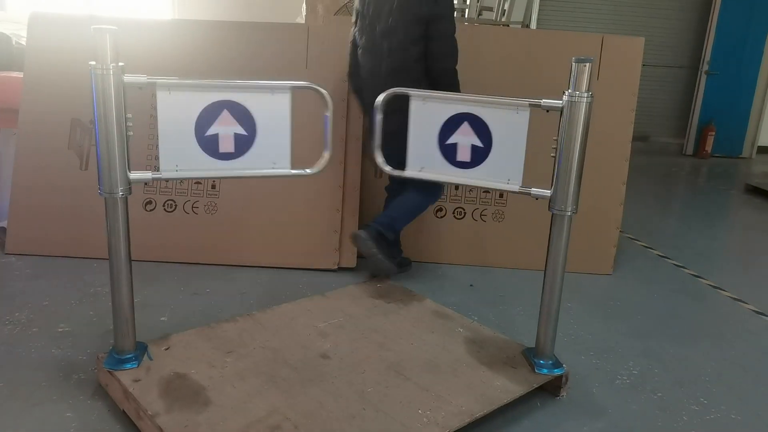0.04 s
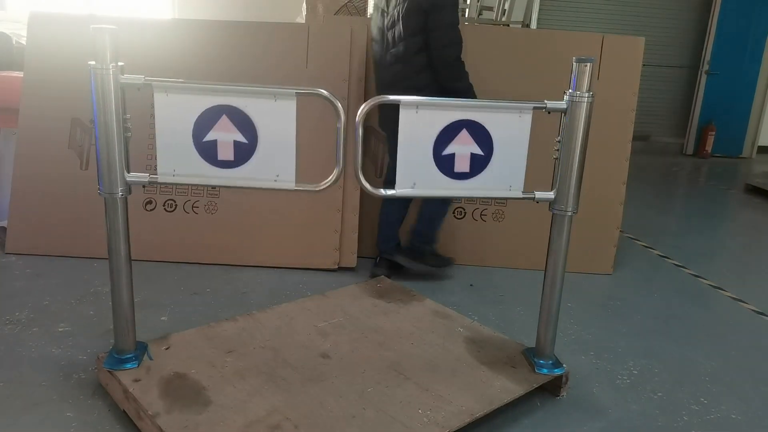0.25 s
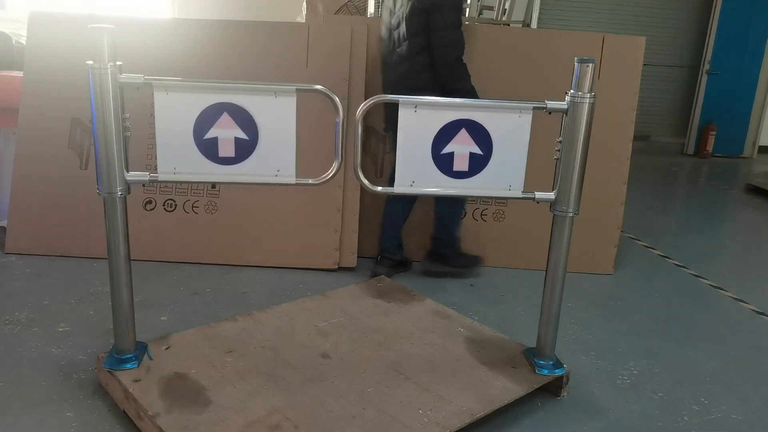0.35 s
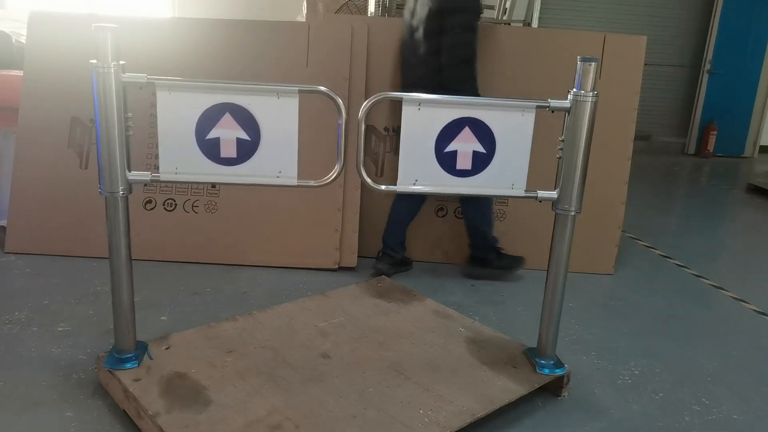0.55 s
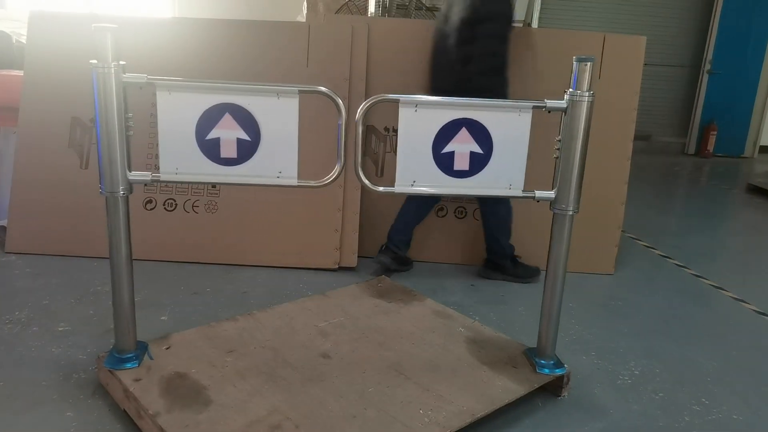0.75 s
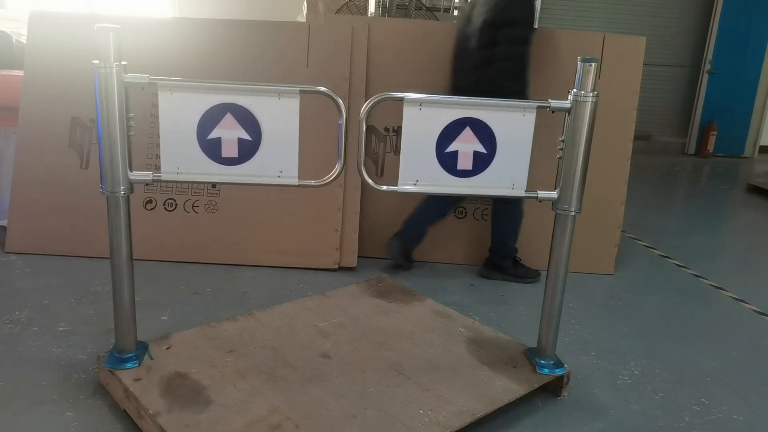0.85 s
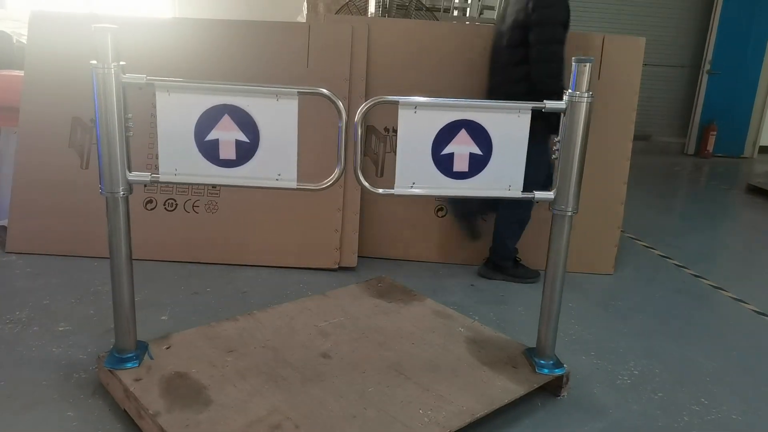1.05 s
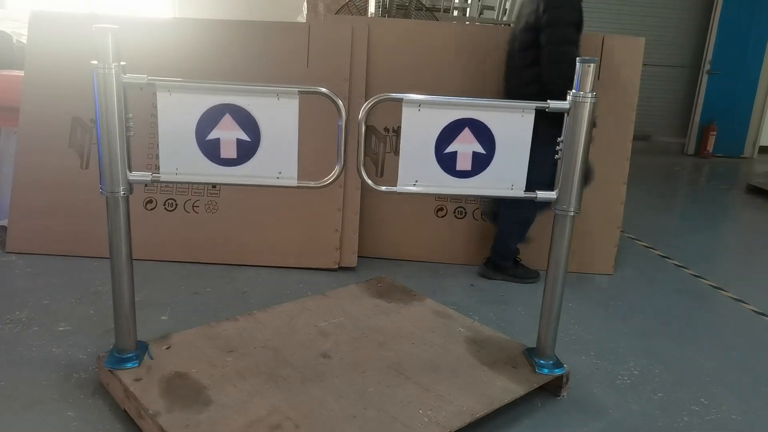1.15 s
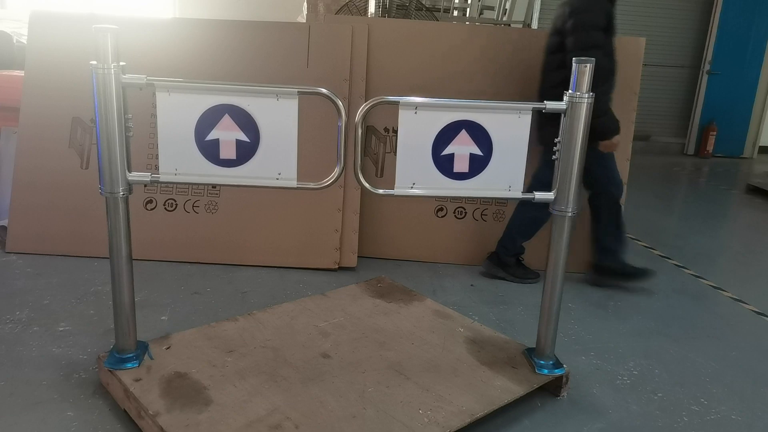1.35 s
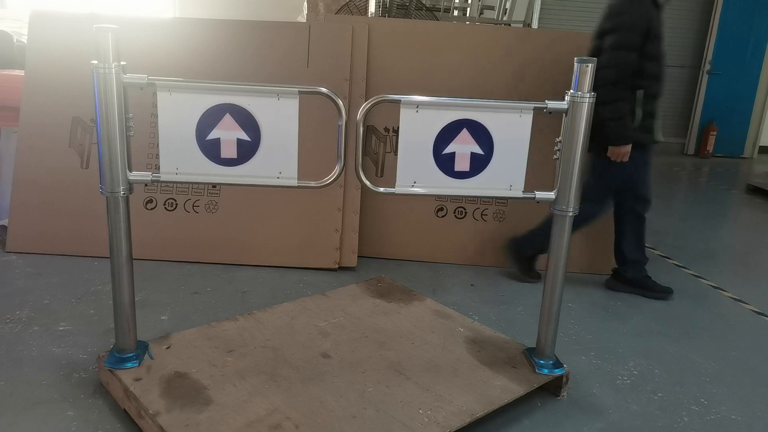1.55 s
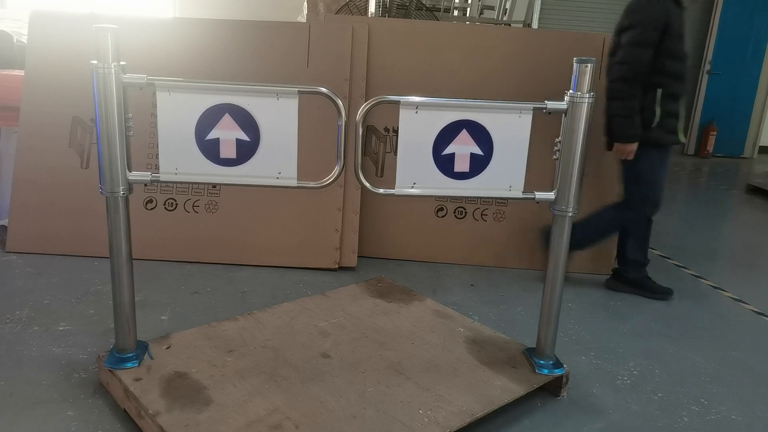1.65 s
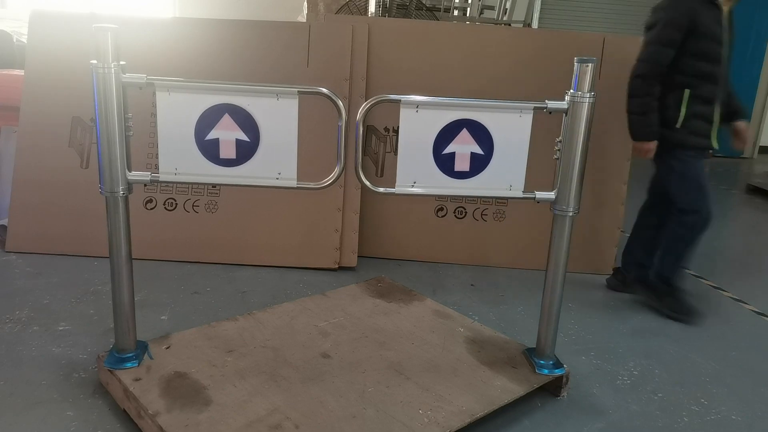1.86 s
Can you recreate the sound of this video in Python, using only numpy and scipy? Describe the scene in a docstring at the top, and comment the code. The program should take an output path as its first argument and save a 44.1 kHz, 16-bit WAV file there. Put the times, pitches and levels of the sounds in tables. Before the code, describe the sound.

A steel swing gate clanks shut at 0.2 seconds in a humming, echoing workshop, rattling on with a ringing frame and ticking latch. From about 0.3 seconds the hollow wooden platform beneath knocks, booms and judders, settling by 0.9. From 1 second soft footsteps move away on concrete while loose metal clinks faintly, and a heavier step at 1.6 seconds leaves a low ring in the floor.

```python
"""A workshop hums; a shoe scuffs faintly. From 0.2 s a steel swing gate falls shut: the wing clanks
against its stop and rattles out, its tube frame sings, the latch ticks. From 0.33 s the post shakes the
hollow wooden platform under it, which knocks, booms and judders. From about 1 s someone walks away while
loose metal clinks; a heavy step at 1.6 s rings the floor.
The right microphone is peaky near 3 kHz, the left near 9 kHz."""
import sys
import numpy as np
from scipy import signal
from scipy.fft import rfft, irfft
from scipy.io import wavfile
from scipy.ndimage import uniform_filter1d

SR = 44100
rng = np.random.default_rng(int(sys.argv[2]) if len(sys.argv) > 2 else 0)


def generate_wav(signal):
    """Clip the signal to [-1, 1] and save it as 16-bit WAV at the path in sys.argv[1]."""
    frames = np.transpose(np.atleast_2d(signal))
    scaled = np.clip(frames, -1, 1) * 32767
    pcm = np.round(scaled).astype(np.int16)
    wavfile.write(sys.argv[1], SR, pcm)


N = 83790

# wing on its stop: t/s, level/dB, ring f/Hz, ring re level/dB, edge re level/dB, ring t60/s
CLANKS = [(0.2024, -33.5, 5030, 1, 9.5, 0.05), (.2175, -28, 3800, 9, -3.5, 0.022),
          (.2225, -24, 3330, 4, -14.5, 0.023), (0.2554, -23.5, 3370, -10, -0.5, 0.023),
          (.2597, -25.5, 2460, 10, -12, 0.033), (0.3041, -32, 2850, 18.5, -11, 0.0061),
          (.313, -29.5, 2800, 8, -2, 0.013), (.338, -22.5, 1870, -4.5, -12.5, 0.066),
          (.395, -36.5, 780, 11.5, -16, 0.065), (0.4212, -36, 2940, 0, 2.5, 0.22),
          (.484, -32, 2770, -2.5, -3.5, 0.24), (.517, -28, 2700, 3, -25, 0.011),
          (.568, -37.5, 2900, 4, -12, 0.053), (.616, -33.5, 2460, 7, -7, 0.035),
          (.644, -33.5, 2640, 3, -12, 0.05), (0.7085, -41.5, 2340, 10, -36, 0.024),
          (.7535, -39.5, 2690, 1.5, -5, 0.064)]
# spectrum of a blow on the platform: f/Hz, level/dB
THUD_COLOUR = [(25, -32), (70, -0.5), (100, -13.5), (140, 0), (220, -5), (450, -16.5), (600, -30),
               (2500, -43.5)]


def amp(db):
    """Decibels to gain."""
    return 10 ** (np.asarray(db) / 20)


def unit(x):
    """Scale to rms 1."""
    return x / np.sqrt(np.mean(x ** 2) + 1e-20)


def read(points, hz):
    """Interpolate a table over log frequency."""
    f_hz, value = np.transpose(points)
    return np.interp(np.log(hz + 1), np.log(f_hz + 1), value)


def envelope(t_s, level_db):
    """Gain curve through breakpoints, silent outside them."""
    return amp(np.interp(np.arange(N) / SR, t_s, level_db, left=-np.inf, right=-np.inf))


def add(mix, t_s, sound):
    """Mix a sound in at t_s."""
    part = mix[..., max(round(t_s * SR), 0):][..., :sound.shape[-1]]
    part += sound[..., :part.shape[-1]]


def convolve(x, response):
    """Convolve per channel, cut to N samples."""
    return signal.fftconvolve(np.atleast_2d(x), np.atleast_2d(response), axes=1)[:, :N]


def colour(points, size=4096):
    """Causal impulse response with the given spectrum."""
    log_gain = np.log(amp(read(points, abs(np.fft.fftfreq(size, 1 / SR)))))
    minimum_phase = np.exp(np.conj(signal.hilbert(log_gain)))
    return np.fft.ifft(minimum_phase).real[:size // 2]


def tint(x, points):
    """Filter at unit power gain for white noise."""
    response = colour(points)
    return convolve(x, response / np.linalg.norm(response))


def diffuse(size):
    """White noise at two microphones: alike in the bass, unrelated in the treble."""
    # left-right likeness: f/Hz, correlation
    likeness = [(300, 0.95), (500, 0.88), (1000, 0.32), (4000, 0.062)]
    left, other = rfft(rng.standard_normal((2, size)))
    same = np.clip(read(likeness, np.fft.rfftfreq(size, 1 / SR)), -1, 1)
    right = same * left + np.sqrt(1 - same ** 2) * other
    return irfft(np.array([left, right]), size)


def decay(t_s, t60_s):
    """Exponential fall, 60 dB in t60_s."""
    return np.exp(-np.log(1000) * t_s / np.maximum(t60_s, 1e-3))


def burst(t60_s, rise_s=1e-4, size=12000):
    """A contact: noise that builds fast and dies away."""
    t = np.arange(size) / SR
    return diffuse(size) * decay(t, t60_s) * (1 - np.exp(-t / rise_s))


def ring(modes):
    """Sum of damped sines, 1 s long."""
    t = np.arange(SR) / SR
    return sum(amp(db) * decay(t, t60_s) * np.sin(2 * np.pi * hz * t) for hz, db, t60_s in modes)


def hall(x, wet_db, build_s=0.0027):
    """Add the workshop's reverberation; each band dies at its own rate."""
    # reverberation time: f/Hz, t60/s
    hall_t60 = [(200, 2.5), (600, 1.34), (2500, 0.92), (5000, 0.84), (9000, 0.43), (16000, 0.64)]
    hz, t, bands = signal.stft(diffuse(SR), SR, nperseg=256)
    tail = signal.istft(bands * decay(t, read(hall_t60, hz)[:, None]), SR)[1]
    tail *= 1 - np.exp(-np.arange(tail.shape[1]) / SR / build_s)
    tail *= np.sqrt(2 * np.log(1000) / SR)  # unit energy at t60 = 1 s
    return x + amp(wet_db) * convolve(x, tail)


def background(hum_db=-42.5):
    """Steady rumble of the hall; a thin treble hiss dips, comes back and then fades."""
    # noise spectra: f/Hz, density/dB
    hum_colour = [(15, -15), (30, -0.5), (72, 1.5), (125, -9.5), (400, -18), (620, -20), (850, -22.5),
                  (1300, -26), (2400, -24.5), (3500, -27.5), (4600, -35), (9000, -41.5)]
    hiss_colour = [(1000, 4), (4500, -5), (9000, 4), (16000, 1.5)]
    # hiss envelope: t/s, level/dB
    hiss_level = [(0, -43.5), (.18, -51.5), (.7, -49), (1.05, -43), (1.45, -49.5), (1.9, -69)]
    hz = np.fft.rfftfreq(N, 1 / SR)
    hum = unit(irfft(rfft(diffuse(N)) * amp(read(hum_colour, hz)), N))
    hiss = unit(irfft(rfft(diffuse(N)) * amp(read(hiss_colour, hz)), N))
    return amp(hum_db) * hum + envelope(*np.transpose(hiss_level)) * hiss


def steps():
    """Shoes on concrete: a low push of the heel, a scuff of the sole."""
    # footfalls: t/s, heel/dB, scuff/dB
    footfalls = [(.005, -60, -43.5), (0.9667, -48, -41), (1.04, -34.5, -41), (1.43, -40, -43),
                 (1.5613, -38, -40.5), (1.662, -41, -42), (1.768, -46, -48.5)]
    # contact spectra: f/Hz, level/dB
    heel_colour = [(25, -46), (70, 18), (130, -12.5), (480, 3.5), (900, -15), (2500, -55)]
    scuff_colour = [(200, -15), (650, 13), (950, -14), (1700, -6.5), (3300, -2.5), (4500, -9.5),
                    (16000, -21)]
    heel, scuff = np.zeros((2, 2, N))
    for t_s, heel_db, scuff_db in footfalls:
        add(heel, t_s, amp(heel_db) * burst(t60_s=0.12, rise_s=0.0045))
        add(scuff, t_s, amp(scuff_db) * burst(t60_s=0.17, rise_s=0.0045))
    return hall(tint(heel, heel_colour) + tint(scuff, scuff_colour), wet_db=0)


def tread(t_s=1.6, level_db=-37, t60_s=0.64):
    """The walker's weight lands and rings the floor's low modes."""
    # floor modes: f/Hz
    floor_hz = [48.7, 73]
    out = np.zeros(N)
    add(out, t_s, ring([(hz, level_db, t60_s) for hz in floor_hz]))
    return out


def judder():
    """The platform chatters on the floor: a dense rumble that swells and settles."""
    # rumble envelopes: t/s, bass/dB, low mids/dB
    levels = [(0.395, -23, -44), (.425, -20.5, -25), (.48, -26.5, -28), (0.598, -27.5, -26),
              (.67, -28, -28.5), (.75, -31, -38), (0.833, -41.5, -47), (1.2, -52, -65)]
    # low-mid spectrum: f/Hz, level/dB
    mid_colour = [(150, -12), (345, -3), (470, -4.5), (570, -17.5), (790, -26.5), (1100, -36), (2500, -42)]
    t_s, bass_db, mid_db = np.transpose(levels)
    bass = envelope(t_s, bass_db) * diffuse(N)
    mids = envelope(t_s, mid_db) * diffuse(N)
    return tint(bass, THUD_COLOUR) + tint(mids, mid_colour)


def shudder(waver_rms=0.013, overtone_db=-29):
    """The shaking post keeps the board droning on a wavering low note."""
    # board's main bending note: t/s, f/Hz, level/dB
    bending_note = [(0.39, 175, -45), (0.409, 162.5, -23), (0.481, 163.9, -19.5), (0.521, 185.6, -20),
                    (0.555, 189.5, -18), (0.644, 169.1, -27.5), (0.682, 169.6, -42), (0.783, 185.2, -27.5),
                    (0.809, 190.4, -51), (0.842, 189.3, -30.5), (.93, 189, -59)]
    t_s, hz, db = np.transpose(bending_note)
    waver = waver_rms * unit(uniform_filter1d(rng.standard_normal(N), size=500))
    pitch_hz = np.interp(np.arange(N) / SR, t_s, hz) * (1 + waver)
    phase = 2 * np.pi * np.cumsum(pitch_hz) / SR
    return envelope(t_s, db) * (np.sin(phase) + amp(overtone_db) * np.sin(2 * phase))


def knocks():
    """The post's foot knocks on the platform: short hollow notes that swell and die."""
    # knocks: t/s, level/dB, f/Hz, swell/s
    hits = [(.333, -29.5, 433, 0.011), (.389, -16, 220, .008), (.463, -24.5, 365.4, 0.024),
            (.518, -13.5, 309, 0.0055), (.556, -16, 332.2, 0.016), (0.598, -25, 377.5, 0.011)]
    out, t = np.zeros(N), np.arange(SR) / SR
    for t_s, db, hz, swell_s in hits:
        swell = (t / swell_s * np.exp(1 - t / swell_s)) ** 2
        add(out, t_s, amp(db) * swell * np.sin(2 * np.pi * hz * t))
    return out


def platform(swell_s=0.0082):
    """The platform takes dull blows; the board's modes swell after each."""
    # blows: t/s, level/dB, ring re level/dB
    thuds = [(.392, -28, 6), (.411, -26, 1), (0.518, -21, 2), (.566, -28, 5.5)]
    # board modes: f/Hz, level/dB, t60/s
    board_modes = [(72, -18, 0.083), (133.2, -1, 0.32), (161.3, -2, 0.26), (182.2, -11, 0.36),
                   (215, 3.5, 0.16), (286.2, -10, 0.89), (330.5, -6, 0.68), (443, -16, 1)]
    blows, boom = np.zeros((2, 2, N))
    board = ring(board_modes) * (1 - np.exp(-np.arange(SR) / SR / swell_s))
    for t_s, db, ring_db in thuds:
        add(blows, t_s, amp(db) * burst(t60_s=0.049, rise_s=0.012))
        add(boom, t_s, amp(db + ring_db) * board)
    return tint(blows, THUD_COLOUR) + boom


def clinks(ring_hz=3330):
    """Loose metal parts touch as the gate settles: a short, high ring."""
    # contacts: t/s, drive level/dB
    contacts = [(.763, -22), (1.0202, -26), (1.098, -30.5), (1.564, -36), (1.763, -32)]
    drive = np.zeros((2, N))
    for t_s, db in contacts:
        add(drive, t_s, amp(db) * burst(t60_s=0.066))
    resonator = signal.iirpeak(ring_hz, Q=7, fs=SR)
    return hall(signal.lfilter(*resonator, drive), wet_db=-4.5)


def latch():
    """Small bright ticks of the mechanism in the post."""
    # ticks: t/s, level/dB
    ticks = [(0.427, -32), (0.5156, -19), (.611, -33), (0.65, -28.5), (.6605, -35)]
    # tick spectrum: f/Hz, level/dB
    tick_colour = [(500, -19), (6200, 1.5), (7600, 4), (10500, 1), (16000, -9)]
    out = np.zeros((2, N))
    for t_s, db in ticks:
        add(out, t_s, amp(db) * burst(t60_s=0.017))
    return hall(tint(out, tick_colour), wet_db=-4.5)


def frame(coupling_db=-15.5, t60_s=0.73, swell_cycles=35):
    """Each clank feeds energy to the tube frame, which sings on; low modes build up last."""
    # steel tube modes: f/Hz, level/dB
    tube_modes = [(334, 11.5), (711, -13), (1001, -6), (2143, -9.5), (2519, -12), (3117, -14.5),
                  (3626, -25)]
    t, energy_in, out = np.arange(N) / SR, np.zeros(N), np.zeros((2, N))
    for t_s, db, *_ in CLANKS:
        energy_in[round(t_s * SR)] += amp(db + coupling_db) ** 2
    for hz, db in tube_modes:
        shape = (1 - np.exp(-(t * hz / swell_cycles) ** 2)) * decay(t, t60_s)
        energy = abs(convolve(energy_in, shape ** 2))
        out += amp(db) * np.sqrt(energy) * np.sin(2 * np.pi * (hz * t + rng.random()))
    return out


def wing(gain_db=-2.5, t60_s=0.15, rise_s=0.00049, ring_width_hz=380):
    """The wing hits its stop: each clank is a sharp-edged crack with a short ring of its own pitch."""
    # crack spectra: f/Hz, level/dB
    body_colour = [(60, -7), (260, -4.5), (540, 1.5), (690, 8), (900, 0.5), (1350, -6), (2000, -3),
                   (2400, -7), (3800, -3), (4600, -12.5), (9000, -46.5)]
    edge_colour = [(300, -42), (2500, -7), (5000, 3.5), (8500, 3), (16000, -9.5)]
    body, edge, rings = np.zeros((3, 2, N))
    for t_s, db, hz, ring_db, edge_db, ring_t60_s in CLANKS:
        add(body, t_s, amp(db) * burst(t60_s, rise_s))
        add(edge, t_s, amp(db + edge_db) * burst(t60_s))
        resonator = signal.iirpeak(hz, Q=hz / ring_width_hz, fs=SR)
        clack = signal.lfilter(*resonator, burst(ring_t60_s, rise_s))
        decay_energy = SR * ring_t60_s / (2 * np.log(1000))
        clack *= np.sqrt(decay_energy) / np.linalg.norm(clack, axis=1, keepdims=True)
        add(rings, t_s, amp(db + ring_db) * clack)
    clanks = tint(body, body_colour) + tint(edge, edge_colour) + rings
    return hall(amp(gain_db) * clanks, wet_db=-0.5)


def scene():
    """Gate, platform, walker and hall, in stereo."""
    steel = wing() + frame() + latch() + clinks()
    wood = platform() + knocks() + judder() + shudder()
    return steel + wood + steps() + tread() + background()


def record(dry, cutoff_hz=15900):
    """Each microphone's colour, then a low-pass."""
    # microphone responses: f/Hz, gain/dB
    left_mic = [(40, 0.5), (200, 4.5), (2400, 2), (3200, -2), (6000, -5.5), (9100, -1.5), (10500, -11.5),
                (13000, -16.5), (16000, -27)]
    right_mic = [(40, -3.5), (200, 4.5), (1900, 3.5), (2500, 12), (3050, 14), (3600, 8.5), (4300, 1.5),
                 (5500, 2.5), (7500, -9), (10000, -26), (16000, -21.5)]
    heard = convolve(dry, np.array([colour(left_mic), colour(right_mic)]))
    lowpass = signal.firwin(511, cutoff_hz, window=("kaiser", 9), fs=SR)
    return signal.oaconvolve(heard, lowpass[None], "same", axes=1)


dry = scene()
out = record(dry)
generate_wav(out)
```